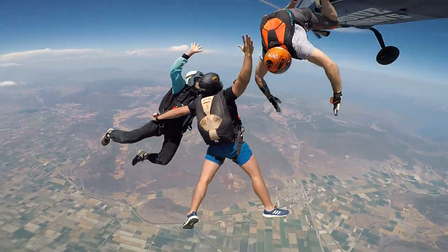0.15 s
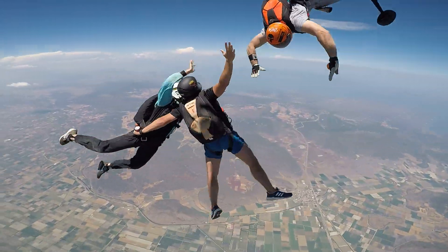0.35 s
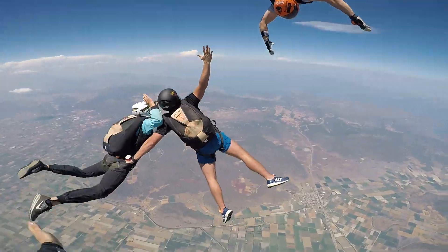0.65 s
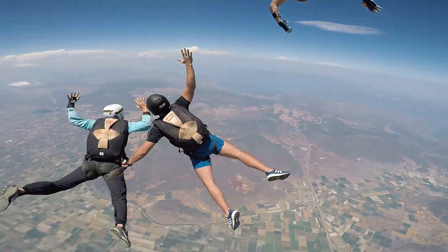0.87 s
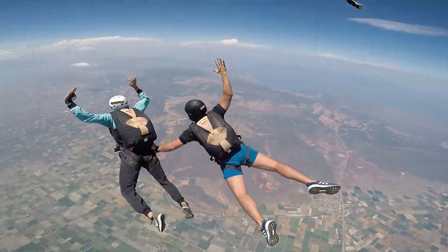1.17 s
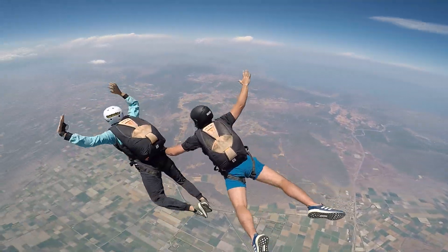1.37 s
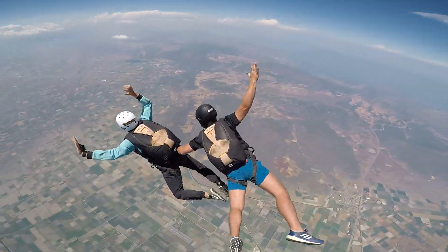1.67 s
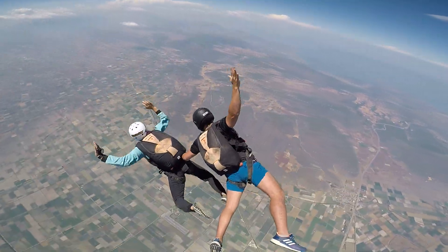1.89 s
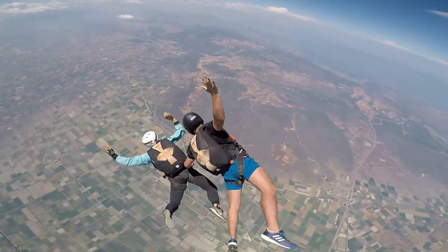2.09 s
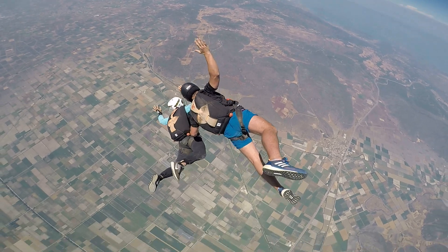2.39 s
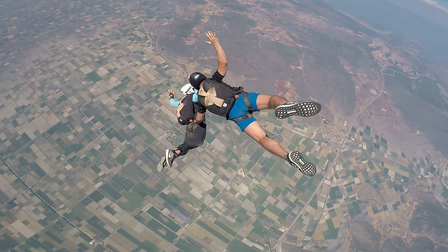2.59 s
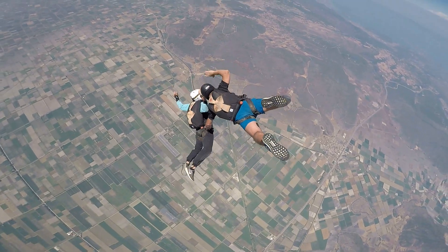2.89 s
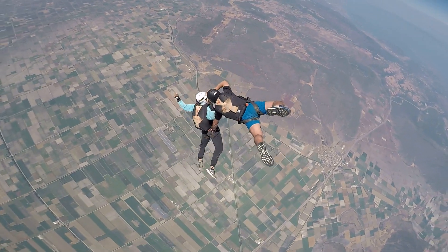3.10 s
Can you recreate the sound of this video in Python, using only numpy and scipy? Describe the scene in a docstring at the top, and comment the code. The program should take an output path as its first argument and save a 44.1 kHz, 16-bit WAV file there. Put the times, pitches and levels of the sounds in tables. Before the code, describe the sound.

Freefall wind hits a close helmet microphone in open air. Low buffeting and crackling slaps open it, with roar swelling from 0.1 s and heavy rumble until 0.4 s. A steadier rushing roar follows, with breathy, wavering whistles strongest around 1.0-1.8 s. At 1.8 s it drops to low rumble and thin hiss on the right. At 2.3 s it surges back with a brief whistle, hard thumps and fluttering hiss.

```python
"""Airstream noise in freefall

Freefall just after leaving an aircraft, heard through two microphone ports of a helmet camera.
Turbulence, as coloured noise under drawn level curves, gives the rumble, buffeting, roar and hiss.
Large eddies thump, slaps of air crackle, and vortices shed from an edge of the housing whistle.
For half a second the ports are sheltered and the roar drops away, then it surges back.
A thin hiss, nearly steady, lies at the right port."""
import sys
import numpy as np
from scipy import signal
from scipy.fft import rfft, irfft, next_fast_len
from scipy.io import wavfile
from scipy.ndimage import uniform_filter1d, minimum_filter1d, map_coordinates

SR = 44100
rng = np.random.default_rng(int(sys.argv[2]) if len(sys.argv) > 2 else 0)


def generate_wav(signal):
    """Clip the signal to [-1, 1] and save it as 16-bit WAV at the path in sys.argv[1]."""
    frames = np.transpose(np.atleast_2d(signal))
    scaled = np.clip(frames, -1, 1) * 32767
    pcm = np.round(scaled).astype(np.int16)
    wavfile.write(sys.argv[1], SR, pcm)


N = 143325

# Level of the deep rumble: start_s, level_db
RUMBLE_LEVEL = [(0, -26.5), (.2, -22), (.33, -17.5), (.45, -29), (1.1, -27), (1.5, -30.5), (1.85, -31.5),
                (2.25, -25), (2.5, -24.5), (2.64, -24), (2.75, -25.5), (2.95, -26), (3.25, -23.5)]
# Level of the rougher buffeting: start_s, level_db
BUFFET_LEVEL = [(0, -19.5), (.12, -19), (.16, -15.5), (.34, -13), (.42, -26.5), (.84, -24), (1.1, -20.5),
                (1.22, -32), (1.5, -33), (1.76, -27.5), (1.86, -29), (2.3, -22.5), (2.53, -25.5),
                (2.58, -21), (2.7, -15.5), (2.76, -13.5), (2.88, -12.5), (2.93, -24.5), (3.25, -20.5)]
# Level of the roar before flutter: start_s, level_db
ROAR_LEVEL = [(0, -43), (.05, -34), (.13, -19), (.5, -16.5), (.58, -15.5), (1.2, -16), (1.5, -18),
              (1.72, -17.5), (1.797, -16), (1.812, -36.5), (1.96, -33.5), (2.08, -28), (2.15, -31),
              (2.3, -24.5), (2.335, -16.5), (2.8, -16.5), (3.14, -18.5), (3.25, -18.5)]
# Level of the hiss before flutter and HISS_LIFT_DB: start_s, level_db
HISS_LEVEL = [(0, -63), (.1, -66), (.13, -34), (.18, -38), (.27, -26.5), (.44, -22.5), (.56, -32.5),
              (.72, -32), (.81, -37.5), (1.1, -24), (1.48, -22), (1.797, -31), (1.812, -51), (2.1, -42.5),
              (2.315, -38), (2.36, -21.5), (2.54, -21), (2.62, -27.5), (2.73, -24.5), (2.78, -29),
              (2.9, -20.5), (3.15, -23.5), (3.25, -21)]
# Edge whistle, whose pitch follows the local airspeed: start_s, pitch_hz, level_db, purity_0_to_1
WHISTLE_PATH = [(0, 1200, -57, 0.3), (.38, 2160, -31, 0), (.44, 2110, -18, 0.4), (.48, 1850, -31, 0),
                (.505, 1700, -18, 0.7), (.55, 1483, -21.5, 0.15), (.63, 1250, -25.5, 0.25),
                (.8, 950, -30, 0.04), (.96, 1458, -17, 0.04), (1.02, 1691, -21.5, 0.15),
                (1.07, 2021, -17, 0.72), (1.25, 2170, -15.5, 0.88), (1.298, 1923, -14.5, 0.7),
                (1.335, 2154, -15.5, .8), (1.5, 2200, -23, 0.47), (1.57, 2084, -16.5, 0.5),
                (1.63, 1902, -17, 0.6), (1.74, 1660, -15.5, 1), (1.795, 1720, -23.5, 0.13),
                (1.815, 1208, -55, 0), (2.315, 1140, -61, .5), (2.328, 1360, -16, 0.74),
                (2.341, 1690, -12.5, .85), (2.362, 1920, -18, 0.96), (2.385, 2197, -37, 0.06),
                (2.93, 1997, -30, 0.26), (3.02, 2220, -18.5, 0.4), (3.09, 1950, -23, .6),
                (3.155, 1834, -30, 0.16), (3.175, 2150, -14.5, .85), (3.25, 2120, -29, 0.4)]
# Big eddies striking the ports: centre_s, length_s, level_db
EDDY_STRIKES = [(0.166, 0.09, -13.5), (0.208, 0.04, -24), (2.559, 0.016, -13.5), (2.599, 0.012, -4.5),
                (2.672, 0.018, -11.5), (2.76, 0.042, -17), (2.956, 0.013, -12), (3.006, 0.0077, -11),
                (3.079, 0.009, -9.5), (3.122, 0.0087, -9.5)]
# Slaps of air that crackle up into the treble: centre_s, length_s, level_db
AIR_SLAPS = [(.026, .016, -21.5), (.078, 0.011, -9), (.119, 0.006, -14), (.146, 0.0077, -34),
             (.207, 0.0077, -6.5), (.245, 0.0095, -6), (.264, 0.011, -19), (.604, 0.019, -19),
             (.725, .016, -16), (.858, 0.004, -37), (1.778, 0.006, -19.5), (2.016, 0.008, -27)]

# Spectral shapes, each later scaled to rms 1: frequency_hz, relative_density_db
LEE_SPECTRUM = [(500, -5), (2000, -16), (3600, 6), (4700, 3.5), (6500, 6.5), (8200, 5.5), (9500, 0),
                (10800, -11.5), (12500, -25)]
RUMBLE_SPECTRUM = [(12, 3.5), (28, 2), (45, -0.5), (70, 1.5), (100, -2), (160, -29), (400, -69.5)]
EDDY_SPECTRUM = [(20, -5), (45, -11.5), (75, 4.5), (130, -1), (250, -10.5), (600, -23.5), (2000, -84)]
BUFFET_SPECTRUM = [(30, -14), (65, -15), (100, 1), (155, -1.5), (250, -7), (400, -14), (800, -22),
                   (2000, -32), (5000, -83)]
SLAP_SPECTRUM = [(100, -15), (350, 8.5), (1000, -1), (2000, -9.5), (3200, -17.5), (4800, -24.5),
                 (6500, -23), (8200, -39), (11000, -60)]
ROAR_SPECTRUM = [(60, -39), (170, -1), (300, -6), (500, -0.5), (800, -2), (1100, -3.5), (1500, -8.5),
                 (2200, -13.5), (3200, -25.5), (5000, -78), (9000, -65)]
HISS_SPECTRUM = [(400, -17), (1200, 3.5), (2000, -0.5), (3000, 2.5), (4000, -0.5), (4900, -1.5),
                 (6200, -2.5), (7200, -7), (8200, -17.5), (10000, -25), (11200, -37), (13000, -59)]

# What reaches the right port: frequency_hz, level_db, likeness_0_to_1, left_phase_lead_rad
RUMBLE_TO_RIGHT = [(30, -2.6, 1, 0), (100, -0.81, 0.83, 0)]
BUFFET_TO_RIGHT = [(30, -16.5, 1, 0), (90, -4, 0.48, 0), (200, -5, 0.35, 0.0079), (400, -5, 0.29, 0.0041)]
FLOW_TO_RIGHT = [(151, -36, 0.9, -6), (340, -9.5, 0.75, -4.5), (650, -3.5, 1, -2.5),
                 (1060, 0.5, 0.94, -2.5), (2170, -.6, 1, -1.79), (3270, 0, 0.6, -1), (4410, -7, 0.9, 1.3),
                 (4900, -20.5, 0, -9), (8000, -14, 0.76, 20)]

LEE_DB = -45
PATCHY_DB = 1.4  # spread of random gain over time and frequency
HISS_LIFT_DB = 3
FULL_BUFFET_DB = -13.5  # buffeting level at which the flutter depth is TEAR_DB
TEAR_DB, TEAR_GROWS, TEAR_HZ = 3, 0.51, 189.2  # flutter depth, growth exponent, knots a second
GUST_DB, GUST_HZ = -0.3, 32.03  # quick gusts shared by roar and hiss: depth, knots a second
JITTER_HZ, WAVER, SPUTTER_DB = 59.8, 0.01716, 3.5  # fast pitch jitter, slower relative waver, level
AIRY_HZ = 360  # approximate reach of the airy band on each side of the whistle
TOP_HZ = 13400


def amp(db):
    """Logarithmic level: decibels become a gain in amplitude."""
    return 10 ** (np.asarray(db) / 20)


def unit(x):
    """Normalisation: mean power becomes 1."""
    return x / np.sqrt(np.mean(x ** 2) + 1e-20)


def along(points, hz):
    """Logarithmic frequency scale: each column of a table is interpolated at hz."""
    f, *columns = np.transpose(points)
    return [np.interp(np.log(hz + 1), np.log(f + 1), column) for column in columns]


def curves(rows):
    """Linear interpolation in time: one value per sample for each column after the first."""
    s, *columns = np.transpose(rows)
    t = np.arange(N) / SR
    return [np.interp(t, s, column) for column in columns]


def wobble(rate):
    """Band-limited fluctuation: a smooth curve through random knots, rate of them a second."""
    knots = rng.standard_normal(8192)
    return map_coordinates(knots, [np.arange(N) * rate / SR + 2], mode="wrap")


def bursts(rows):
    """Superposition of energy: bell-shaped bursts add in power and yield one gain."""
    t = np.arange(N) / SR
    power = sum(amp(db) ** 2 * np.exp(-(2 * (t - s) / length) ** 2) for s, length, db in rows)
    return np.sqrt(power)


def filtered(x, response):
    """Linear filtering: the spectrum of x is multiplied by a complex response."""
    m = next_fast_len(N + SR // 2)  # padding limits wrap-around
    return irfft(rfft(x, m) * response(np.fft.rfftfreq(m, 1 / SR)), m)[..., :N]


def rush(spectrum, patchy_db):
    """Turbulence noise: two unrelated coloured noises share patches of random gain, at rms 1."""
    cells = signal.stft(rng.standard_normal((2, N)), nperseg=256)[2]
    patches = rng.standard_normal(cells.shape[1:])
    patches = uniform_filter1d(patches, size=5, axis=0)  # across frequency
    patches = uniform_filter1d(patches, size=8, axis=1)  # across time
    pair = signal.istft(cells * amp(patchy_db * unit(patches)), nperseg=256)[1][:, :N]
    return unit(filtered(pair, lambda hz: amp(along(spectrum, hz)[0])))


def churn(spectrum, even):
    """Low turbulence: dividing by a power of the short-term energy partly evens out chance swells."""
    pair = rush(spectrum, patchy_db=.5)
    power = np.abs(uniform_filter1d(pair ** 2, size=SR // 25, axis=1)) + 1e-6
    return unit(pair / power ** (even / 2))


def ports(pair, to_right):
    """Partial coherence: left is the first signal, right a phase-shifted mix of it and the second."""
    def response(hz):
        db, alike, phase = along(to_right, hz)
        alike = np.clip(alike, 0, 1)
        shared = alike * np.exp(-1j * phase)
        separate = np.sqrt(1 - alike ** 2)
        return amp(db) * np.array([shared, separate])
    right = filtered(pair, response).sum(axis=0)
    return np.array([pair[0], right])


def lee_hiss():
    """Lee turbulence: thin noise at the sheltered right port, its level wavering slightly."""
    return amp(LEE_DB + 0.76 * wobble(42)) * rush(LEE_SPECTRUM, PATCHY_DB)[0]


def pounding(buffeting):
    """Large-scale turbulence: rumble and eddies nearly alike at both ports, buffeting less so."""
    deep = amp(curves(RUMBLE_LEVEL)[0]) * churn(RUMBLE_SPECTRUM, even=0.5)
    eddies = bursts(EDDY_STRIKES) * churn(EDDY_SPECTRUM, even=0.55)
    body = buffeting * churn(BUFFET_SPECTRUM, even=0.87)
    return ports(deep + eddies, RUMBLE_TO_RIGHT) + ports(body, BUFFET_TO_RIGHT)


def flaps():
    """Transient excitation: short slaps of air are bursts of broadband noise."""
    return bursts(AIR_SLAPS) * rush(SLAP_SPECTRUM, PATCHY_DB)


def whistle():
    """Vortex shedding: an edge tone wavers and sputters, and when impure yields to a noise band."""
    pitch_hz, db, purity = curves(WHISTLE_PATH)
    moving_hz = pitch_hz * (1 + WAVER * wobble(70)) + JITTER_HZ * wobble(400)
    carrier = np.exp(2j * np.pi * np.cumsum(moving_hz) / SR)
    tone = unit(amp(SPUTTER_DB * wobble(140)) * carrier.real)
    # complex noise on the carrier spreads it into a band
    spread = wobble(2 * AIRY_HZ) + 1j * wobble(2 * AIRY_HZ)
    airy = unit((spread * carrier).real)
    sound = amp(db) * (np.sqrt(purity) * tone + np.sqrt(1 - purity) * airy)
    return np.array([sound, np.zeros(N)])


def airstream(buffeting):
    """Amplitude modulation: roar and hiss flutter more deeply as the buffeting grows."""
    tear_db = TEAR_DB * (buffeting / amp(FULL_BUFFET_DB)) ** TEAR_GROWS
    # flutter in decibels raises mean power; this offset roughly cancels the rise
    offset_db = tear_db ** 2 * np.log(10) / 20
    flutter_db = tear_db * wobble(TEAR_HZ) - offset_db + GUST_DB * wobble(GUST_HZ)
    roar_db = curves(ROAR_LEVEL)[0] + 0.88 * flutter_db
    hiss_db = curves(HISS_LEVEL)[0] + HISS_LIFT_DB + flutter_db
    roar = amp(roar_db) * rush(ROAR_SPECTRUM, PATCHY_DB)
    hiss = amp(hiss_db) * rush(HISS_SPECTRUM, PATCHY_DB)
    return roar + hiss


def scene():
    """Superposition: pounding and flow noise reach both ports, the lee hiss the right one only."""
    buffeting = amp(curves(BUFFET_LEVEL)[0])
    out = pounding(buffeting)
    out += ports(flaps() + whistle() + airstream(buffeting), FLOW_TO_RIGHT)
    out[1] += lee_hiss()
    return out


def record(dry):
    """Peak limiting and band limiting: one fast gain serves both ports, then a cut at TOP_HZ."""
    needed = np.minimum(1, .95 / (np.abs(dry).max(axis=0) + 1e-9))
    gain = uniform_filter1d(minimum_filter1d(needed, size=200), size=200)
    return filtered(dry * gain, lambda hz: hz < TOP_HZ)


dry = scene()
out = record(dry)
generate_wav(out)
```